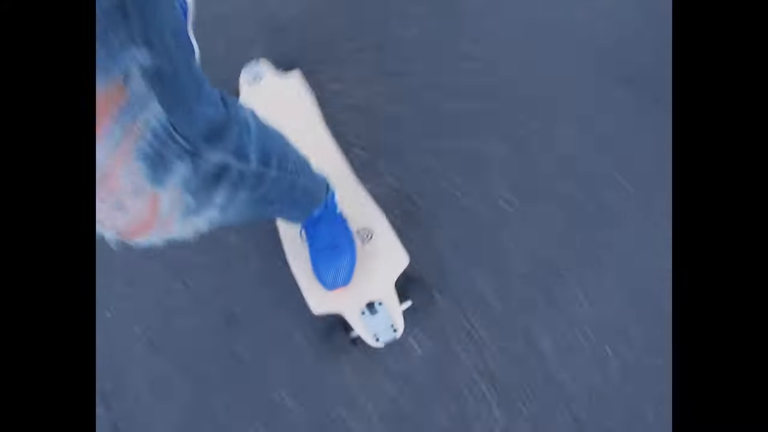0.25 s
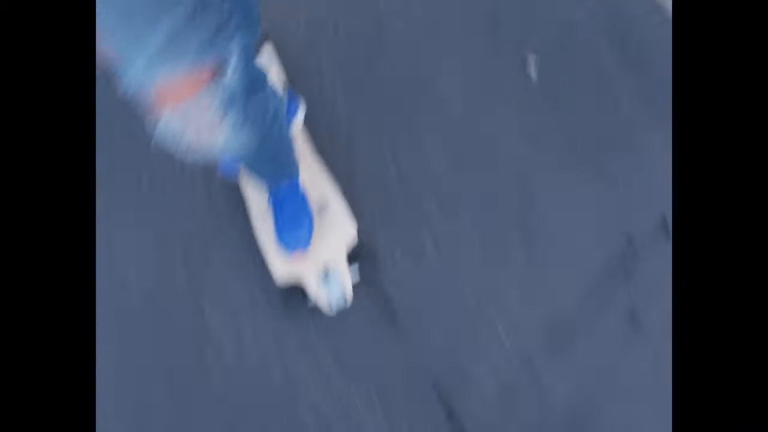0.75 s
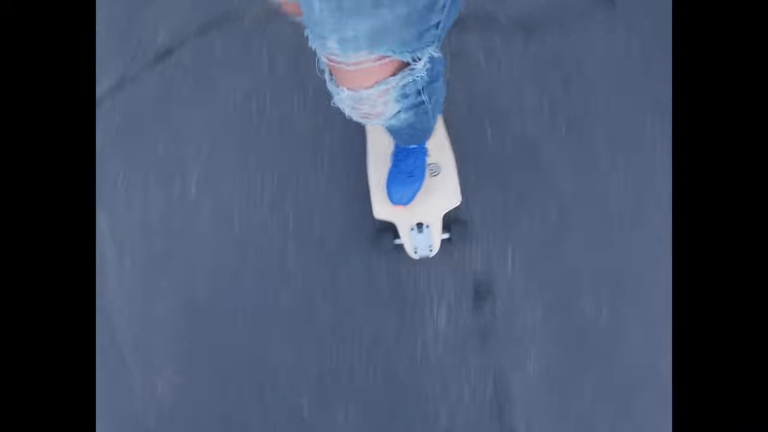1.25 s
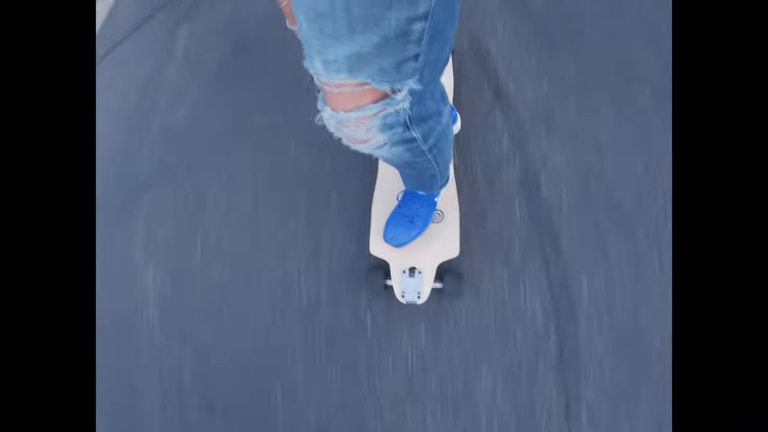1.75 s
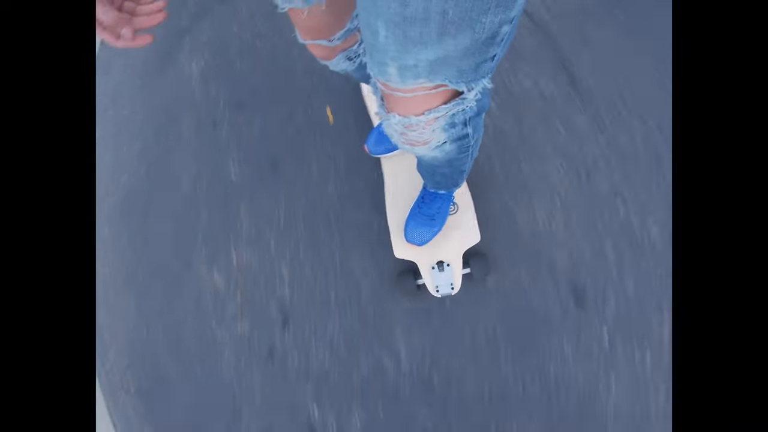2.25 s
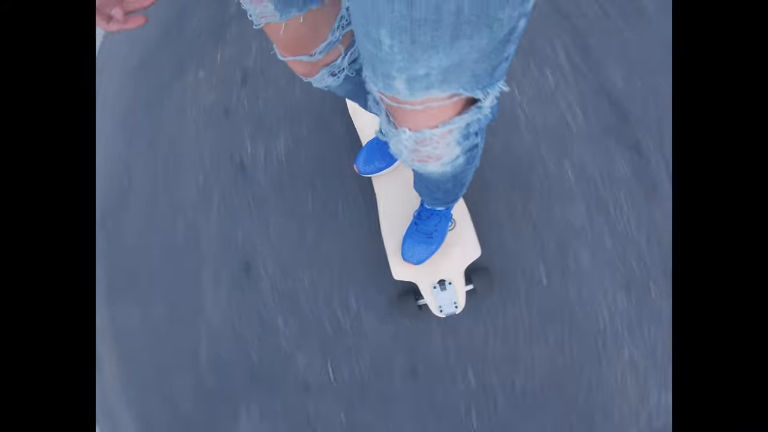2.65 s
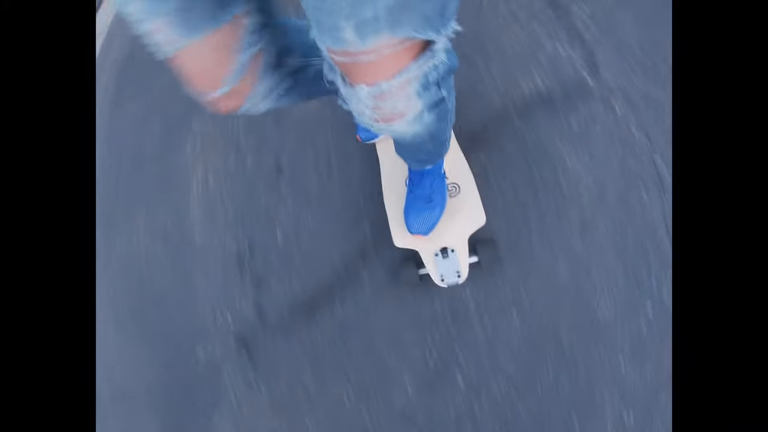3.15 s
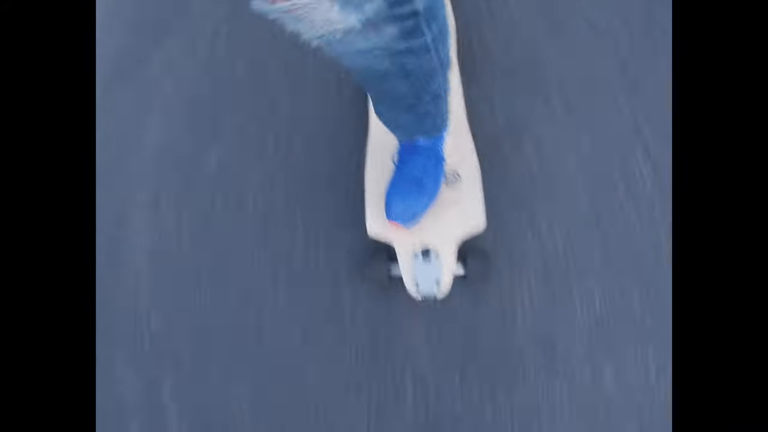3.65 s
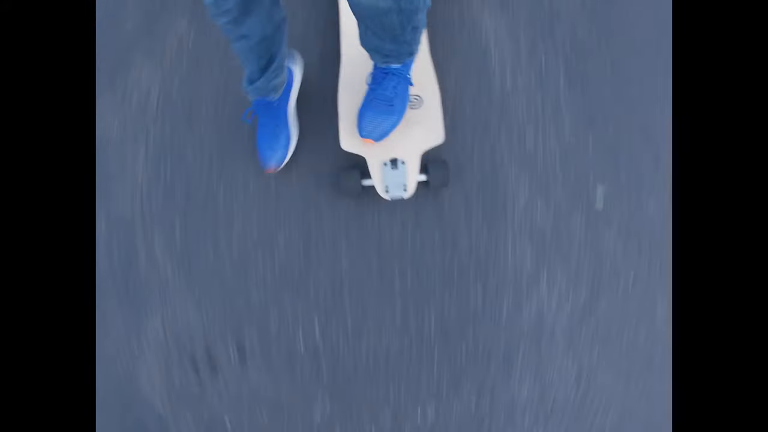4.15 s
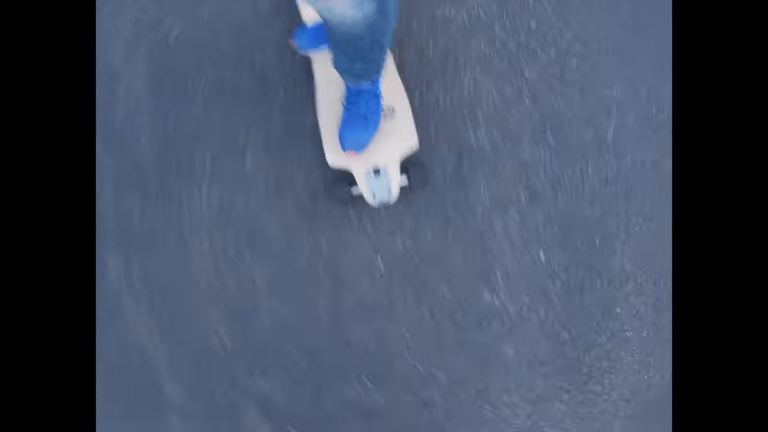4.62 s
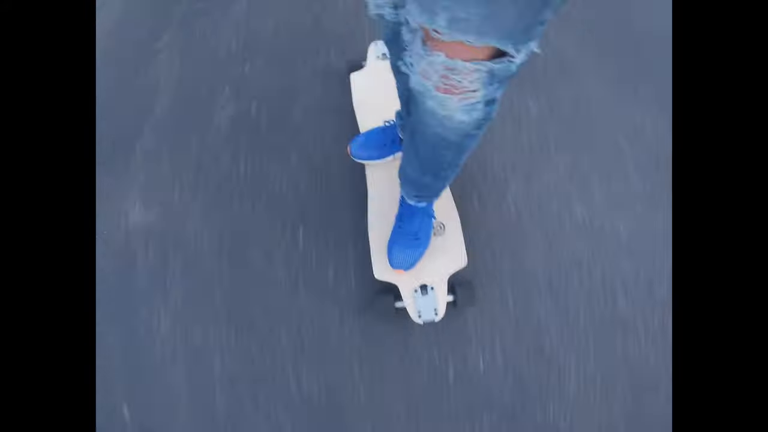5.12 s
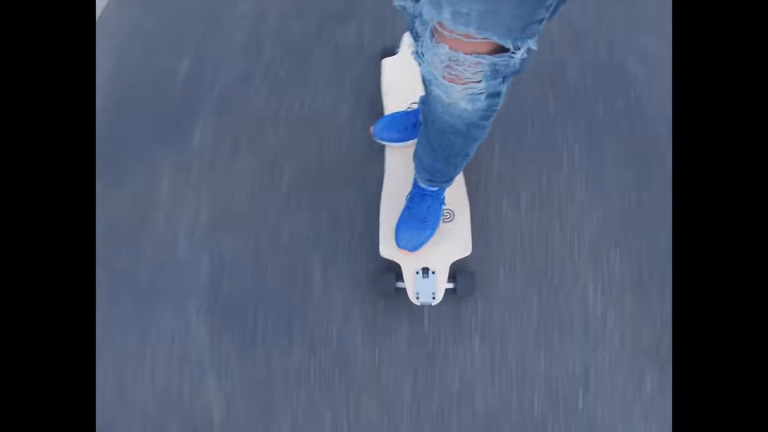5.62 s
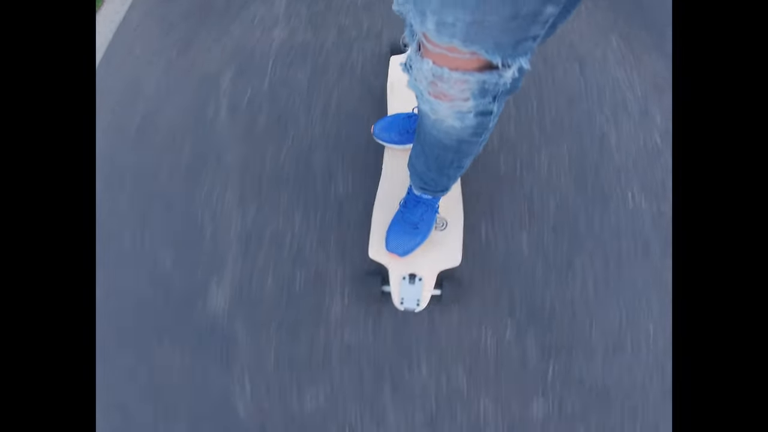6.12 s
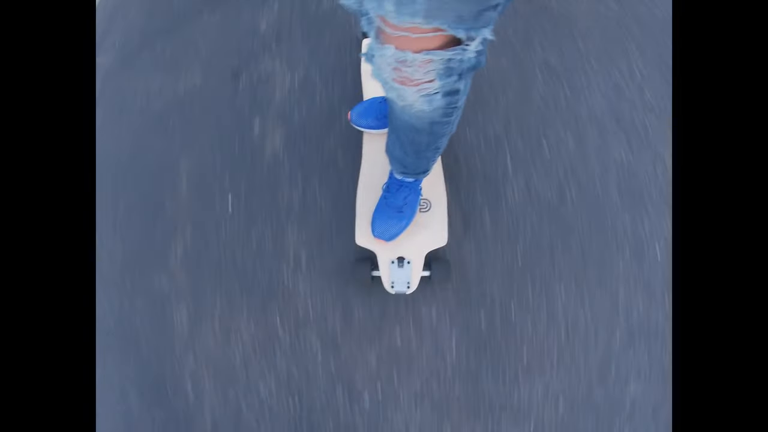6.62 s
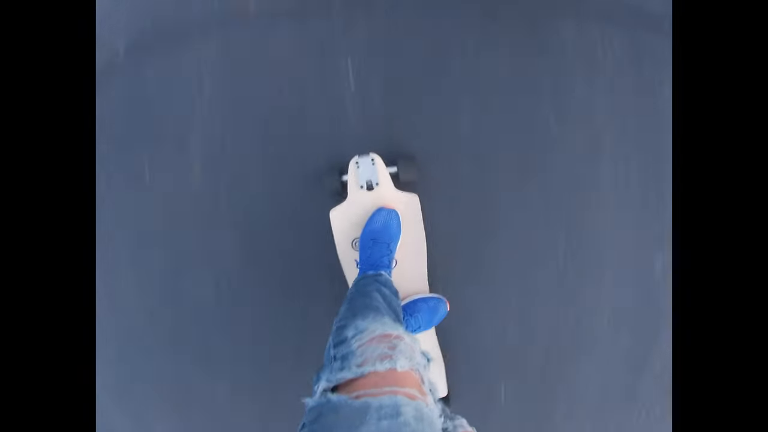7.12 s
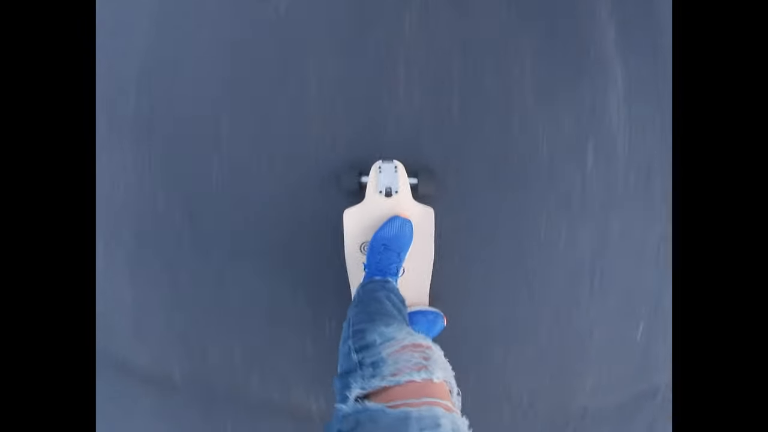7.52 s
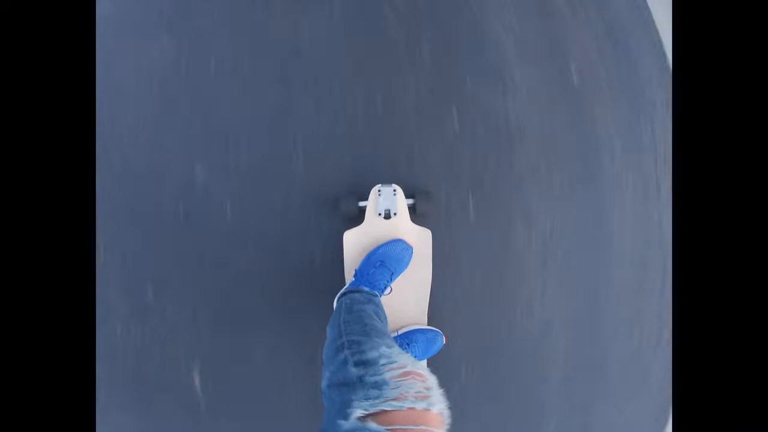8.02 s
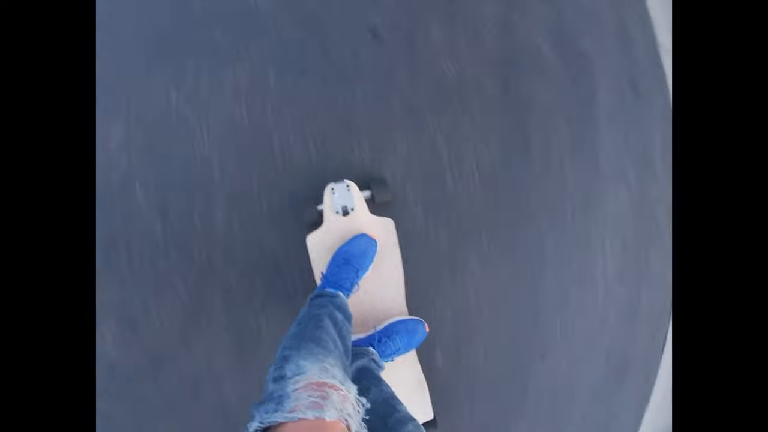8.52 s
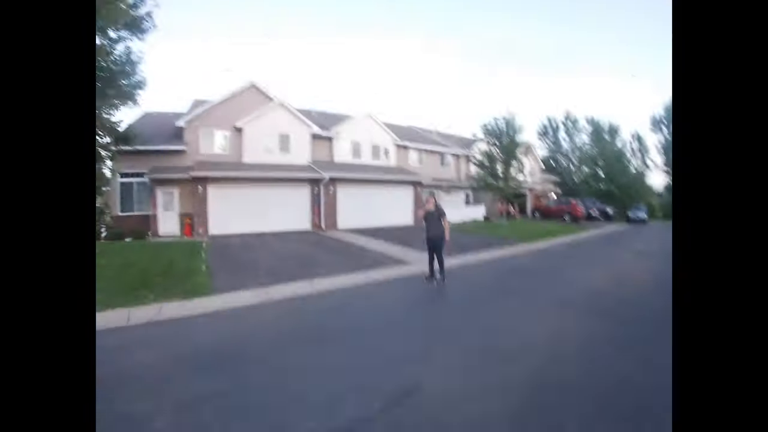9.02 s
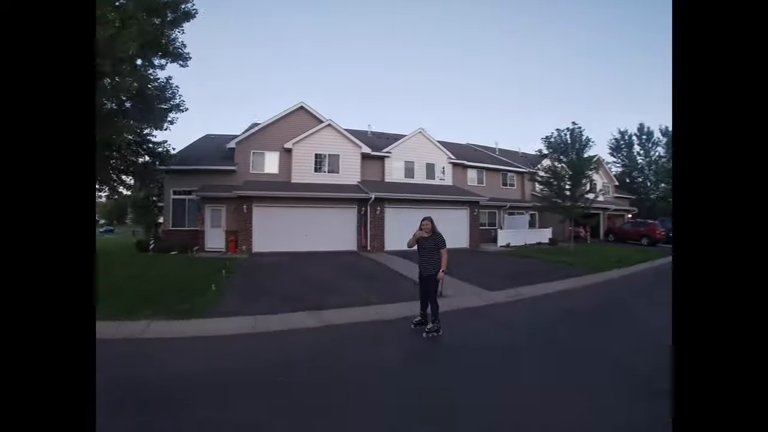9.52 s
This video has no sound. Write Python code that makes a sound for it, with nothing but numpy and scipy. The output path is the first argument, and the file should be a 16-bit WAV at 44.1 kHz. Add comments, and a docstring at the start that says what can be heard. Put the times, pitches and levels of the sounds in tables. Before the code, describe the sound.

Close rolling of a longboard on a street: hollow rattling knocks, gritty ticks and shoe scuffs, a few faint bird chirps, later wind gusts.

```python
"""An asphalt street: a longboard rolls along, heard from a camera in the rider's hand.
Random blows from the road's grain excite resonances of wheels and deck, and grit crunches as filtered noise.
Knocks strike decaying modes; ticks snap, shoes and grit rasp, fingers rub and a bird chirps with an echo.
Late on the board is heard from its other side, then from higher up, with wind buffeting the microphone."""
import sys
import numpy as np
from scipy import signal
from scipy.fft import rfft, irfft
from scipy.io import wavfile
from scipy.ndimage import uniform_filter1d, map_coordinates

SR = 44100
rng = np.random.default_rng(int(sys.argv[2]) if len(sys.argv) > 2 else 0)


def bounce(signal):
    """Save signal as a 16-bit WAV file at the path given by the first command-line argument."""
    frames = np.transpose(np.atleast_2d(signal))
    limited = np.clip(frames, -1, 1)
    pcm = np.round(limited * 32767).astype(np.int16)
    wavfile.write(sys.argv[1], SR, pcm)


N = 430429
TIME = np.arange(N) / SR
TURN_S = 6.852  # from here the board is heard from its other side

# rolling heard over the board, before trims: (time [s], wheel ring [dB], deck boom [dB], grit crunch [dB])
ROLL_NEAR = [(0.0, -21, -25, -37), (0.21, -27, -31, -51), (0.57, -25.5, -26, -49),
             (1.03, -25.5, -29.5, -50.5), (1.18, -27.5, -27, -54.5), (1.56, -26, -32.5, -51.5),
             (1.92, -28, -36.5, -53.5), (2.27, -28.5, -32, -50), (2.59, -27.5, -32, -53),
             (3.05, -34.5, -37.5, -59), (3.42, -32.5, -33, -50.5), (3.52, -26, -32, -56),
             (3.7, -28, -32, -52.5), (3.96, -29.5, -34.5, -51), (4.5, -28.5, -29, -47.5),
             (4.88, -28.5, -34.5, -49.5), (5.22, -27, -34, -47), (5.9, -31.5, -38, -50.5),
             (6.29, -28.5, -36.5, -52.5), (6.84, -28.5, -33.5, -49.5)]
# knocks: bumps in the road, and some handling bumps as the camera is raised; part levels before trims:
# (time [s], ring peak [dB], pitch factor of the ring [1], clack [dB], thump [dB], ping [dB])
KNOCK_EVENTS = [(0.038, -17, 0.94, -29, -30, -30), (0.222, -14.5, 1.17, -33, -18, -45),
                (0.372, -24, 1, -30, -32, -30), (0.377, -13.5, 0.92, -38, -34, -34),
                (0.515, -21, 0.71, -25.5, -15, -38), (0.536, -10, 0.84, -36, -16, -43),
                (0.578, -16, 0.72, -45, -9, -50), (0.768, -6, 0.8, -22.5, -22, -42),
                (0.779, -11, 1.12, -41, -18, -45), (1.048, -14, 0.72, -37.5, -8.5, -48),
                (1.075, -14.5, .72, -46, -18, -52), (2.202, -9.5, 0.76, -29, -6, -38),
                (2.316, -15, 0.86, -42, -27, -38), (2.373, -11, 0.82, -34, -21, -38),
                (2.512, -4.5, 0.85, -39, -11, -35), (2.694, -17, 0.89, -45, -16, -27),
                (2.765, -10, 1.14, -26.5, -6, -32), (2.782, -7.5, 1.0, -26, -5, -31),
                (3.529, -15, 1.3, -43, -35, -30), (3.624, -16, 1.3, -38, -36, -29),
                (3.655, -13, 1.22, -25.5, -32, -34), (3.722, -14, 1.15, -34, -38, -27),
                (3.755, -21, 1.15, -37, -38, -33), (3.864, -13.5, 1.24, -39, -38, -31),
                (3.921, -17.5, 1.25, -45, -38, -37), (4.96, -33, 1.14, -33, -34, -19.5),
                (5.017, -17, 0.95, -33, -28, -36), (5.065, -17, 1.15, -39, -28, -22),
                (5.298, -18, 0.87, -28, -33, -28), (5.350, -14, 0.94, -25, -15, -28),
                (5.438, -6.5, 0.96, -19.5, -10, -17), (5.745, -7.5, 1.08, -23, -17, -31),
                (5.762, -1.5, 0.95, -28, 0, -25), (5.855, -11.5, 1.15, -33, -10, -27),
                (5.863, -18, 1.06, -27, -22, -35), (6.048, -10.5, 1.09, -27.5, -8, -29),
                (6.214, -17, 1.02, -47, -35, -44), (6.354, -11, 1.06, -45, -12, -47),
                (7.035, -13.5, 0.71, -38, -34, -42), (7.585, -11.5, 1.21, -39, -36, -22),
                (7.777, -13, 1.33, -32, -38, -34), (7.799, -14.5, 1.4, -32, -40, -34),
                (7.869, -13, 1.2, -39, -38, -36), (8.067, -16, 0.95, -33.5, -36, -34),
                (8.78, -18, 0.86, -37, -18, -37), (8.977, -20, .7, -42, -10, -25),
                (9.031, -19, .62, -38, -15, -23), (9.392, -16.5, 0.93, -37, -30, -33),
                (9.422, -10.5, 0.85, -34, -22, -17), (9.429, -15, 0.85, -46, -26, -34),
                (9.507, -18, 0.77, -44, -17, -34), (9.671, -12, 1.05, -37.5, -34, -33),
                (9.683, -21, 0.92, -55, -40, -50), (9.698, -17, 0.91, -55, -41, -50),
                (9.747, -5, 0.95, -33, -15, -40)]
# resonance of the wheels heard over the board: (frequency [Hz], relative density [dB per Hz])
WHEELS_NEAR = [(190, -18), (330, -15), (383, -11), (420, -4.5), (485, 1.5), (591, -1), (640, -4.5),
               (725, -3.5), (810, -15), (940, -14), (1060, -23.5), (1240, -24), (1450, -46.5),
               (1880, -34.5), (3190, -120)]
# spectrum of rough rubbing: (frequency [Hz], relative density [dB per Hz])
RASP_SPECTRUM = [(400, -40.5), (1100, 11), (1900, 7.5), (3500, -3), (4600, -8.5), (5700, -11.5),
                 (8000, -28), (12000, -44.5), (16000, -49)]
# spectrum of a hard clack or tick: (frequency [Hz], relative density [dB per Hz])
CLICK_SPECTRUM = [(300, -27.5), (900, 13), (1700, 2.5), (3000, -3.5), (4300, -5.5), (5200, -18),
                  (6500, -24.5), (8300, -29), (10000, -38.5), (15000, -40.5)]


def gain_of(db):
    """Level to amplitude: 20 dB is a factor of ten."""
    return 10 ** (np.asarray(db) / 20)


def evened(x):
    """Normalisation of the mean power: scales to rms 1."""
    return x / np.sqrt(np.mean(x ** 2) + 1e-20)


def level(rows, axis=1):
    """Piecewise-linear level in dB: one column of a curve as a gain for every sample."""
    rows = np.asarray(rows)
    return gain_of(np.interp(TIME, rows[:, 0], rows[:, axis]))


def add(mix, s, sound):
    """Superposition: mixes a sound in at time s."""
    part = mix[max(round(s * SR), 0):][:len(sound)]
    part += sound[:len(part)]


def coloured(x, points, size=4096):
    """Minimum-phase filtering: the spectrum fixes a causal ring that follows every blow."""
    hz, db = np.transpose(points)
    bin_hz = abs(np.fft.fftfreq(size, 1 / SR))
    bin_db = np.interp(np.log(bin_hz + 1), np.log(hz + 1), np.maximum(db, -100))
    log_gain = np.log(gain_of(bin_db))
    # the Hilbert transform of the log gain gives the minimum phase
    ring = np.fft.ifft(np.exp(np.conj(signal.hilbert(log_gain)))).real
    return signal.oaconvolve(x, ring[:size // 2])[:len(x)]


def wander(rate_hz):
    """Band-limited random modulation: smooth chance of rms 1, up to about the given rate."""
    hz = np.fft.rfftfreq(N, 1 / SR)
    weight = hz / (hz + 2) / (1 + (hz / rate_hz) ** 4)
    return evened(irfft(rfft(rng.standard_normal(N)) * weight, N))


def stones(per_s, spread_db, largest=6):
    """Random impulse process: blows of either sign, many small and a few large."""
    size = gain_of(spread_db * np.minimum(rng.exponential(1, N), largest))
    return size * rng.choice([-1, 1], N) * (rng.random(N) < per_s / SR)


def retuned(x, factor):
    """Time-varying resampling: reading faster or slower shifts all resonances by the factor."""
    return map_coordinates(x, [np.cumsum(factor) % N], order=1, mode="wrap")


def by_position(near, turned, lifted):
    """Dependence on the listening point: over the board, at its other side, then lifted away."""
    lift_s, lift_length_s = 8.7, 0.11
    lift = np.clip((TIME - lift_s) / lift_length_s, 0, 1)
    return np.where(TIME < TURN_S, near, (1 - lift) * turned + lift * lifted)


def pressed(start, end, crest):
    """Contact pressure: a triangle from 0 to 1 and back, its crest at a share of the contact time."""
    return np.interp((TIME - start) / (end - start), [0, np.clip(crest, .05, .95), 1], [0, 1, 0])


def bird(echo_s=0.043, echo_db=-10, street_db=-5, street_s=0.032):
    """Reflection of nearly pure gliding tones: house fronts throw the notes back and smear them."""
    # notes: (time [s], length [s], top pitch [Hz], place of the top [0-1], level before a 1 dB lift [dB])
    chirps = [(0.284, 0.049, 5050, 0.2, -50), (0.299, 0.054, 3990, 0.25, -47.5),
              (0.434, 0.053, 3980, .2, -46), (0.581, 0.052, 3950, 0.13, -50.5),
              (1.942, 0.052, 5470, 0, -46), (2.082, 0.062, 4510, 0.27, -43.5), (2.224, 0.054, 4130, 0, -48),
              (2.288, 0.045, 4130, 0.1, -53), (3.17, 0.055, 4500, 0.05, -55),
              (3.294, 0.054, 4420, 0.1, -54), (3.34, 0.05, 4150, .15, -55), (3.413, 0.052, 4500, 0.25, -52)]
    fall = 0.29  # largest share of its top pitch that a note loses
    swell = 0.97  # exponent on the half-sine swell of a note
    flutter_db = 1.5  # the notes arrive broken by passing reflections
    out = np.zeros(N)
    for s, length, top_hz, crest, db in chirps:
        u = np.linspace(0, 1, round(length * SR))
        hz = top_hz * (1 - fall * np.sin(1.9 * (u - crest) / (1 - crest)) ** 2)
        tone = np.sin(2 * np.pi * np.cumsum(hz) / SR)
        note = gain_of(db + 1) * tone * abs(np.sin(np.pi * u)) ** swell
        add(out, s, note)
        add(out, s + echo_s, gain_of(echo_db) * note)
    out = out * gain_of(flutter_db * np.tanh(wander(rate_hz=120)))
    t = np.arange(SR // 3) / SR
    street = rng.standard_normal(len(t)) * t * np.exp(-t / street_s)
    reverb = signal.oaconvolve(out, street / np.linalg.norm(street))[:N]
    return out + gain_of(street_db) * reverb


def wind():
    """Turbulent pressure: lumpy low noise whose gusts rise fast and die away, and a faint narrow drone."""
    # gusts: (time of the crest [s], level [dB], decay time constant [s])
    blasts = [(0.61, -39, .16), (1.27, -35, .16), (1.6, -35, .14), (3.66, -33.5, 0.21), (4.21, -36.5, 0.2),
              (6.92, -22, 0.15), (7.12, -27, .16), (7.42, -27.5, 0.24), (7.76, -30, 0.16),
              (8.16, -33, 0.14), (8.72, -23, 0.11), (8.84, -28, .07), (8.98, -27.5, .1), (9.4, -26, 0.048)]
    # spectrum of the buffeting: (frequency [Hz], relative density [dB per Hz])
    gust_spectrum = [(10, -7), (25, 0), (40, -3), (80, -0.5), (120, -8.5), (200, -25), (400, -36),
                     (1000, -77.5), (4000, -100)]
    near_db, turned_db, rise_s = -48, -37, 0.033
    follow = 0.22  # exponent by which the steady wind grows with the rolling
    pace = evened(level(ROLL_NEAR, axis=2)) ** follow
    power = np.where(TIME < TURN_S, gain_of(near_db) * pace, gain_of(turned_db)) ** 2
    for s, db, fall_s in blasts:
        decay = np.where(TIME < s, ((s - TIME) / rise_s) ** 2, (TIME - s) / fall_s)
        power = power + (gain_of(db) * np.exp(-decay)) ** 2
    lumps = gain_of(2.5 * wander(rate_hz=10))
    buffet = evened(coloured(rng.standard_normal(N), gust_spectrum) * lumps)
    drone_hz = 75 + 3 * wander(rate_hz=37)
    drone = np.sin(2 * np.pi * np.cumsum(drone_hz) / SR) * gain_of(-48.5 + 2.5 * wander(rate_hz=11))
    return buffet * np.sqrt(power) + drone * (TIME < TURN_S)


def handling():
    """Dry friction: hand and sleeve rub in lumps, pressing harder until the crest, then holding and letting go."""
    # spectrum of the rubbing: (frequency [Hz], relative density [dB per Hz])
    rustle_spectrum = [(30, -7), (70, 3), (140, 6.5), (300, 4.5), (500, -11.5), (1000, -17), (2000, -22.5),
                       (4500, -48), (7000, -65), (12000, -75)]
    # the camera swings up
    start_s, top_s, stop_s, release_s, rub_db = 8.64, 8.85, 9.11, 0.03, -31
    rub = coloured(stones(per_s=500, spread_db=1.5), rustle_spectrum) * gain_of(3.2 * wander(rate_hz=45.0))
    pressure = np.minimum((TIME - start_s) / (top_s - start_s), (stop_s - TIME) / release_s)
    return gain_of(rub_db) * evened(rub) * np.clip(pressure, 0, 1)


def fingers(crest=0.26, catch_db=4, catch_hz=110, drift=.007):
    """Stick-slip: fingers catch and slide on the camera and ring its case, whose pitch shifts with the grip."""
    # modes of the camera's case: (frequency [Hz], relative level [dB], 60 dB decay time [s])
    case_modes = [(2550, 3, 0.011), (3260, 3.5, 0.0092), (5400, -1.5, 0.012), (7830, -36, .012)]
    # fingers shifting: (start [s], end [s], level [dB])
    touches = [(0.562, 0.59, -44), (1.385, 1.397, -29), (1.31, 1.67, -47), (1.485, 1.535, -50),
               (9.506, 9.514, -34)]
    out, t = np.zeros(N), np.arange(SR // 30) / SR
    ring = sum(gain_of(db - 60 * t / t60) * np.sin(2 * np.pi * hz * t) for hz, db, t60 in case_modes)
    slips = rng.standard_normal(N) * gain_of(catch_db * wander(rate_hz=catch_hz))
    case = signal.oaconvolve(slips, ring)[:N]
    slide = evened(retuned(case, 1 + drift * wander(rate_hz=25)))
    for start, end, db in touches:
        out += gain_of(db) * slide * pressed(start, end, crest)
    return out


def jump_click(decay_s=0.00033):
    """Exponential pulse: one thin click at the instant when the colour of the rolling changes abruptly."""
    out = np.zeros(N)
    add(out, TURN_S, gain_of(-13) * np.exp(-np.arange(SR // 100) / SR / decay_s))
    return out


def whine(waver=0.026, flutter_db=3):
    """Frequency modulation: a thin tone, perhaps from a bearing, wavers as it swells and fades."""
    start_s, end_s, centre_hz, whine_db = 8.32, 8.7, 1325, -42.5
    u = np.clip((TIME - start_s) / (end_s - start_s), 0, 1)
    hz = centre_hz * (1 + waver * wander(rate_hz=110))
    tone = np.sin(2 * np.pi * np.cumsum(hz) / SR)
    return tone * np.sqrt(abs(np.sin(np.pi * u))) * gain_of(whine_db + flutter_db * wander(rate_hz=50))


def scuffs():
    """Sliding friction: small slips make rasping scuffs of shoes and short swells of grit, with a finer swish."""
    # scuffs and grit swells:
    # (start [s], end [s], rasp before a 3 dB lift [dB], place of the crest [0-1], swish [dB])
    drags = [(0.0, 0.13, -36.5, 0.9, -61), (0.13, 0.22, -38.5, 0.37, -64), (0.507, 0.555, -32, 0.1, -55),
             (0.735, 0.78, -42, .85, -52), (0.834, 0.877, -46, 0.7, -65), (0.956, 0.995, -40, 0.4, -65),
             (1.262, 1.431, -37, 0.8, -56), (1.726, 1.79, -48, 0.3, -66), (2.338, 2.42, -42.5, 0.45, -51),
             (2.777, 2.89, -40.5, 0.8, -45), (3.067, 3.15, -48.5, 0.1, -65), (3.19, 3.252, -52, .7, -52),
             (3.47, 3.732, -39.5, 0.13, -54), (4.226, 4.265, -44, 0.3, -48), (4.27, 4.284, -32, 0.5, -45),
             (4.678, 4.73, -39.5, 0.17, -39.5), (5.409, 5.445, -34.5, 0.34, -40),
             (5.546, 5.734, -58, 0.5, -46), (5.73, 5.776, -37, 0.3, -41), (7.305, 7.373, -39.5, 0.45, -60),
             (7.568, 7.66, -47.5, 0.55, -64), (7.71, 7.862, -36, 0.24, -52),
             (9.373, 9.427, -44.5, 0.4, -62), (9.488, 9.517, -41, 0.8, -62), (9.727, 9.75, -41, .35, -62)]
    # spectrum of the swish: (frequency [Hz], relative density [dB per Hz])
    swish_spectrum = [(900, -28.5), (2000, -8), (3200, 4), (4400, 0), (6500, -9), (8000, -17), (10500, -22),
                      (15000, -44)]
    bite = 0.63  # exponent under 1: the rasp sets in quickly and holds
    out = np.zeros(N)
    slips = coloured(stones(per_s=1600, spread_db=2.5, largest=3.2), RASP_SPECTRUM)
    rasp = evened(slips * gain_of(4.3 * np.tanh(wander(rate_hz=220))))
    fine_slips = coloured(stones(per_s=5000, spread_db=2.0, largest=3.5), swish_spectrum)
    swish = evened(fine_slips * gain_of(2.1 * wander(rate_hz=200)))
    for start, end, rasp_db, crest, swish_db in drags:
        pressure = pressed(start, end, crest) ** bite
        out += (gain_of(rasp_db + 3.0) * rasp + gain_of(swish_db) * swish) * pressure
    return out


def lesser_ticks():
    """Random scatter about a mean: ticks of chance size and pitch fill each gritty stretch."""
    # gritty stretches, levels before trims: (start [s], end [s], typical tick peak [dB], snap peak [dB])
    gritty = [(0.0, 0.12, -30, -58), (0.96, 1.025, -33, -64), (2.352, 2.394, -26, -48),
              (3.475, 3.59, -28, -52), (4.335, 4.4, -26.5, -48), (4.529, 4.63, -31, -68),
              (8.749, 9.053, -36, -73)]
    per_s, spread_db, centre_hz, spread_octaves = 70, 3, 2500, 0.34
    rows = []
    for start, end, peak_db, snap_db in gritty:
        for s in np.arange(start, end, 1 / per_s):
            late, size, pitch = rng.standard_normal(3)
            size_db = spread_db * size
            hz = centre_hz * 2 ** (spread_octaves * pitch)
            rows.append((s + .5 * np.tanh(late) / per_s, peak_db + size_db, hz, snap_db + size_db))
    return rows


def ticks(rise_s=0.0011, decay_s=0.0023, width_hz=1400, snap_s=0.0011):
    """Damped resonance under a noise burst: a bright snap and brief rattle around each tick's own pitch."""
    # sharp ticks and clicks, mostly grit, a few from touches on the camera; levels before trims:
    # (time [s], tick peak [dB], centre frequency [Hz], snap peak [dB])
    sharp_ticks = [(0.002, -11.5, 3000, -38), (0.038, -13.5, 2200, -52), (0.066, -20, 3200, -45),
                   (0.079, -12, 1900, -52), (0.0905, -10, 1650, -52), (0.102, -8.5, 1900, -43),
                   (0.131, -25, 2800, -58), (0.405, -23, 2900, -59), (0.5707, -17, 2440, -49),
                   (0.772, -23, 2200, -48), (0.869, -24, 1800, -62), (1.287, -29, 2500, -60),
                   (1.307, -29, 2800, -60), (1.352, -20, 1750, -56), (1.371, -24, 1900, -54),
                   (1.3887, -12.5, 2000, -47), (1.401, -20, 2200, -58), (1.684, -42, 1910, -41),
                   (1.742, -26.5, 2700, -64), (1.998, -32, 3600, -45), (2.206, -18.5, 1900, -58),
                   (2.3146, -14, 2500, -39), (2.389, -22, 2610, -30.5), (2.69, -22.5, 2370, -62),
                   (2.703, -25, 2400, -62), (2.7636, -15, 1990, -36), (2.953, -48, 4000, -49),
                   (3.171, -25, 2200, -52), (3.478, -25, 3300, -43), (3.4853, -20, 2600, -40),
                   (3.501, -21, 3400, -48), (3.5086, -12.5, 3640, -39), (3.5172, -11.5, 2600, -47),
                   (3.524, -21, 2600, -53), (3.564, -23, 3300, -46), (3.5715, -15, 2880, -48),
                   (3.602, -20.5, 3200, -56), (3.619, -24, 4000, -52), (3.625, -15.5, 3380, -40),
                   (3.6533, -17, 3500, -42), (3.917, -16, 3720, -55), (4.0775, -15.5, 3170, -45),
                   (4.101, -24, 3200, -58), (4.189, -30, 4400, -56), (4.2373, -16.5, 2810, -38),
                   (4.277, -16, 2600, -50), (4.2845, -16, 3000, -41), (4.341, -22, 2900, -46),
                   (4.361, -28, 2600, -40), (4.3688, -27, 2270, -34), (4.508, -25.5, 3000, -56),
                   (4.523, -25, 3000, -61), (4.5604, -19, 2390, -60), (4.571, -30, 2600, -62),
                   (4.638, -26, 2300, -62), (4.67, -22, 3000, -60), (4.718, -25, 2700, -54),
                   (4.821, -32, 2600, -62), (4.868, -32, 2900, -62), (5.088, -27, 3000, -60),
                   (5.118, -25, 2800, -60), (5.193, -31, 3000, -58), (5.218, -29, 2600, -60),
                   (5.277, -27, 3200, -52), (5.3096, -26, 4250, -35), (5.351, -18, 1650, -56),
                   (5.4385, -21, 1570, -33.5), (5.446, -24, 3000, -43), (5.505, -43, 4000, -43),
                   (5.546, -46, 4000, -43), (5.761, -9.5, 1860, -35.5), (5.9665, -29, 3120, -27.5),
                   (5.971, -18, 1200, -43), (6.3425, -24, 3600, -33.5), (6.65, -27, 2800, -58),
                   (6.7481, -20.5, 2000, -54), (8.7164, -19.5, 2200, -56), (8.838, -26, 2410, -58),
                   (8.977, -28, 1600, -66), (9.0669, -20, 1800, -58), (9.397, -26, 3200, -57),
                   (9.42, -25, 3000, -62), (9.4225, -14, 1300, -66), (9.508, -14.5, 1700, -49),
                   (9.636, -31, 2800, -60), (9.734, -19.5, 1980, -66)]
    # spectrum of the snap: (frequency [Hz], relative density [dB per Hz])
    snap_spectrum = [(2000, -7), (3500, 4.5), (5500, 1), (6600, 0), (8300, -15), (10000, -11),
                     (15000, -43.5)]
    out, t = np.zeros(N), np.arange(SR // 25) / SR
    for s, peak_db, hz, snap_db in list(sharp_ticks) + lesser_ticks():
        rattle, crack = rng.standard_normal((2, len(t)))
        ring = np.exp(-np.pi * width_hz * t) * np.cos(2 * np.pi * hz * t)
        burst = rattle * np.exp(-t / decay_s) * (1 - np.exp(-t / rise_s))
        tick = coloured(signal.fftconvolve(burst, ring)[:len(t)], CLICK_SPECTRUM)
        snap = coloured(crack * np.exp(-t / snap_s), snap_spectrum)
        add(out, s, gain_of(peak_db - 5.0) * tick / abs(tick).max())
        add(out, s, gain_of(snap_db + 9.5) * snap / abs(snap).max())
    return out


def run_ups(rise_s=0.0055, ring_db=-15, crunch_db=-9):
    """Growing excitation: wheel-coloured noise and a crunch swell just before each knock."""
    out, t = np.zeros(N), np.arange(-SR // 30, SR // 100) / SR
    # a bump's rough rim comes first: exponential growth up to the blow, then a fast Gaussian fall
    swell = np.exp(np.minimum(t / rise_s, -(t / rise_s * 2) ** 2 * (t > 0)))
    for s, peak_db, _, clack_db, _, _ in KNOCK_EVENTS:
        shake, grain = rng.standard_normal((2, len(t)))
        ring = evened(coloured(shake, WHEELS_NEAR))
        crunch = evened(coloured(grain, RASP_SPECTRUM))
        stir = gain_of(peak_db + ring_db) * ring + gain_of(clack_db + crunch_db) * crunch
        add(out, s + t[0], swell * stir)
    return out


def struck_ring(t, tune, hard_db, climb_s=0.0024, chatter=0.066, chatter_s=0.0045):
    """Modal synthesis: a soft contact makes the modes swell over a few cycles before they decay."""
    # modes of board and wheels, before tuning and tilt:
    # (frequency [Hz], relative level [dB], 60 dB decay time [s])
    board_modes = [(165, -28, 0.039), (235, 0, 0.11), (354, -5, 0.02), (501, 5.5, 0.051),
                   (585, 22.5, 0.035), (692, 11, 0.044), (889, -2, 0.055)]
    lowest_hz, contact_hz = 140, 1300
    soft_wheel = signal.butter(2, [lowest_hz, contact_hz], "bandpass", fs=SR, output="sos")
    modes = np.zeros(len(t))
    for hz, db, t60 in board_modes:
        modes += gain_of(db + hard_db * np.log2(hz) - 60 * t / t60) * np.sin(2 * np.pi * hz * tune * t)
    shake = rng.standard_normal(len(t))
    blow = signal.unit_impulse(len(t)) + chatter * shake * np.exp(-(t / chatter_s) ** 2 / 2)
    ring = signal.fftconvolve(blow, modes)[:len(t)] * np.tanh(t / climb_s)
    return signal.sosfilt(soft_wheel, ring)


def knocks(clack_s=0.0039, clack_rise_s=0.00088, thump_hz=158, thump_s=0.0056,
           ping_hz=1210, ping_s=0.0055, ping_rise_s=0.00092, ping_jitter=0.02):
    """Impact excitation: each knock joins a modal ring, a clack as of trucks, a hub-like ping and a deck thump."""
    hard_db_per_octave = 10  # tilt towards the high modes when clack and ring levels are equal
    hard_per_clack = 0.39  # drop of that tilt for each dB less of clack
    out, t = np.zeros(N), np.arange(SR // 8) / SR
    thump = np.sin(2 * np.pi * thump_hz * t) * t / thump_s * np.exp(1 - t / thump_s)
    clack_swell = np.exp(-t / clack_s) * (1 - np.exp(-t / clack_rise_s))
    ping_swell = np.exp(-t / ping_s) * (1 - np.exp(-t / ping_rise_s))
    for s, peak_db, tune, clack_db, thump_db, ping_db in KNOCK_EVENTS:
        rattle, jitter = rng.standard_normal((2, len(t)))
        ring = struck_ring(t, tune, hard_db_per_octave + hard_per_clack * (clack_db - peak_db))
        ping = np.sin(2 * np.pi * ping_hz * t + ping_jitter * np.cumsum(jitter)) * ping_swell
        clack = coloured(rattle * clack_swell, CLICK_SPECTRUM)
        add(out, s, gain_of(peak_db) * ring / abs(ring).max() + gain_of(ping_db) * ping)
        add(out, s, gain_of(clack_db + 3.5) * clack / abs(clack).max() + gain_of(thump_db - 14.5) * thump)
    return out


def load():
    """Stiffness under load: a push squeezes the wheels at first and stiffens the deck while it lasts."""
    # the rider stands on one leg to push:
    # (start [s], end [s], rise of the wheels' pitch factor [1], time over which that rise eases off [s])
    pushes = [(-0.4, 1.4, .17, .65), (3.35, 4.95, .125, 1.4)]
    shift_s = .27  # the weight shifts over
    deck_stiffen = .12  # rise of the deck's pitch factor
    wheels, deck = 0.97, .94  # pitch factors when coasting
    for start, end, squeeze, relax_s in pushes:
        wheels = wheels + squeeze * np.interp(TIME - start, [0, shift_s, shift_s + relax_s], [0, 1, 0])
        deck = deck + deck_stiffen * np.clip(np.minimum(TIME - start, end - TIME) / shift_s, 0, 1)
    sway = 1 + 0.02025 * wander(rate_hz=5.0)  # the rider's balancing moves both rings
    return wheels * sway, deck * sway


def pebbles(per_s=60, spread_db=1.5, cycles=1.52):
    """Size sets pitch: loose grains crack under the wheels in clumps as short damped rings."""
    t, out = np.arange(SR // 100) / SR, np.zeros(N)
    for hz in np.geomspace(1200, 6000, 9):
        cracks = stones(per_s, spread_db, largest=3)
        swell = np.exp(-hz * t / cycles) * np.tanh(hz * t / cycles)
        ring = np.sin(2 * np.pi * hz * t) * swell * hz ** 0.55
        out += signal.oaconvolve(cracks, ring)[:N]
    return evened(out * gain_of(5 * np.tanh(wander(rate_hz=90))))


def wheel_ring(road, tune):
    """Forced resonance: the road's grain rings the wheels; load and balance retune them until the turn."""
    # wheels at the other side and lifted away: (frequency [Hz], relative density [dB per Hz])
    wheels_turned = [(210, -43.5), (350, -11), (400, -13), (449, -1), (529, 0.5), (612, -1.5), (670, -7.5),
                     (727, -7), (800, -13.5), (880, -12), (1070, -25), (1190, -20), (1600, -42),
                     (2080, -67), (3520, -120)]
    wheels_lifted = [(200, -20.5), (350, -8.5), (440, 0.5), (540, 3), (620, -1.5), (720, -1.5), (830, -7),
                     (1050, -11), (1200, -10.5), (1400, -24), (1700, -27.5), (2200, -63.5), (5000, -100)]
    near = retuned(evened(coloured(road, WHEELS_NEAR)), tune)
    turned = evened(coloured(road, wheels_turned))
    lifted = evened(coloured(road, wheels_lifted))
    return by_position(near, turned, lifted)


def deck_boom(road, tune):
    """Low plate resonance: the same grain booms in the deck, retuned by load and balance."""
    # resonance of the deck before retuning: (frequency [Hz], relative density [dB per Hz])
    deck_spectrum = [(65, -48), (110, -14.5), (130, -8.5), (161, -0.5), (204, 4), (243, 2), (295, 0),
                     (335, -5.5), (380, -12.5), (490, -45.5), (840, -100)]
    return retuned(evened(coloured(road, deck_spectrum)), tune)


def grit_crunch(road, patches):
    """Granular noise: road blows, cracking pebbles and fine noise are filtered by the listening position."""
    # grit over the board, at its other side and lifted away: (frequency [Hz], relative density [dB per Hz])
    grit_near = [(800, -18.5), (1300, 0), (1600, -3), (2200, -6.5), (3000, -6), (3900, -8.5), (4800, -12.5),
                 (5600, -14.5), (6700, -15.5), (7500, -29.5), (8500, -35.5), (12000, -62.5)]
    grit_turned = [(880, -19.5), (1500, -1.5), (1800, -6), (2400, -9), (3200, -9.5), (4600, -17.5),
                   (6300, -20), (7800, -31), (9000, -42), (16000, -74.5)]
    grit_lifted = [(900, -0.5), (1450, 0.5), (1900, -4.5), (2700, -6), (3600, -7.5), (4500, -15),
                   (5500, -16), (6200, -26.5), (7200, -39.5), (8500, -52.5), (16000, -83)]
    loose = np.where(TIME < TURN_S, .8, .55) * pebbles()  # the later stretch of road is cleaner
    sand = evened(road) + loose + rng.standard_normal(N)
    sand = sand * gain_of(patches + 2.0 * wander(rate_hz=210))
    return by_position(*(evened(coloured(sand, c)) for c in (grit_near, grit_turned, grit_lifted)))


def fine_hiss(patches):
    """Broadband contact noise: the finest grain hisses in the high treble and swells with rough patches."""
    # hiss over the board, before a 1 dB cut: (time [s], level [dB])
    near_curve = [(0.0, -78), (1.2, -81), (2.25, -71.5), (3.18, -74.5), (3.58, -68), (5.56, -62.5),
                  (6.0, -67.5), (6.69, -66.5), (6.84, -67)]
    # spectrum of the hiss: (frequency [Hz], relative density [dB per Hz])
    fine_spectrum = [(5000, -27.5), (7500, 2), (8500, -5.5), (9400, 0.5), (10300, -3), (11500, -12),
                     (14000, -18.5), (15000, -33.5)]
    turned_db, lifted_db = -80.5, -83.5
    hiss_gain = by_position(level(near_curve) * gain_of(-1), gain_of(turned_db), gain_of(lifted_db))
    hiss = evened(coloured(rng.standard_normal(N), fine_spectrum))
    return hiss * hiss_gain * gain_of(1.3 * patches)


def rolling():
    """Common excitation: one grain drives wheels, deck and grit, and rough patches swell all parts together."""
    # rolling at the other side, before trims:
    # (time [s], wheel ring [dB], deck boom [dB], grit crunch [dB])
    roll_turned = [(6.9, -21.5, -35, -44), (7.05, -23, -41.5, -44.5), (7.17, -25.5, -38.5, -44.5),
                   (7.46, -26.5, -39.5, -47), (7.84, -21.5, -41, -44.5), (8.11, -24, -42.5, -46),
                   (8.5, -21.5, -35.5, -48.5), (8.85, -30.5, -40, -47), (9.18, -31.5, -39.5, -49),
                   (9.72, -33, -35, -50.5)]
    wheels_trim_db, deck_trim_db, grit_trim_db = 0.86, 1.5, 1.5
    roll = np.vstack([ROLL_NEAR, roll_turned])
    patches = wander(rate_hz=19.0)
    swell = gain_of(1.16 * patches)
    road = stones(per_s=3500, spread_db=2.0)
    wheel_tune, deck_tune = load()
    wheels = wheel_ring(road, wheel_tune) * level(roll, axis=1) * gain_of(wheels_trim_db) * swell
    deck = deck_boom(road, deck_tune) * level(roll, axis=2) * gain_of(deck_trim_db) * swell
    grit = grit_crunch(road, patches) * level(roll, axis=3) * gain_of(grit_trim_db)
    return wheels + deck + grit + fine_hiss(patches)


def scene():
    """Superposition: all sources add at the one microphone."""
    background = bird() + wind() + handling() + fingers() + jump_click()
    contact = whine() + scuffs() + ticks() + run_ups() + knocks()
    return (background + contact + rolling())[None]


def record(dry):
    """Peak limiting and band limiting: the whole sound ducks at hard peaks and recovers at a steady rate."""
    limit_db, recover_db_per_s, edge_hz = -6, 46, 15100
    over_db = np.maximum(20 * np.log10(abs(dry[0]) + 1e-9) - limit_db, 0)
    recovery = recover_db_per_s * TIME
    # a running maximum on a rising ramp holds each peak and lets it fall linearly in dB
    duck_db = uniform_filter1d(np.maximum.accumulate(over_db + recovery) - recovery, size=128)
    low_pass = signal.firwin(511, edge_hz, window=("kaiser", 9), fs=SR)
    return signal.oaconvolve(dry * gain_of(-duck_db), low_pass[None], "same")


dry = scene()
out = record(dry)
bounce(out)
```